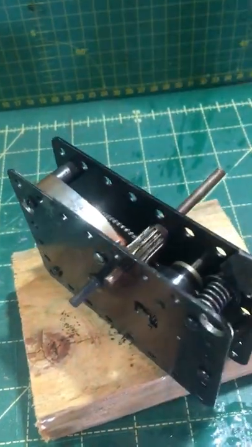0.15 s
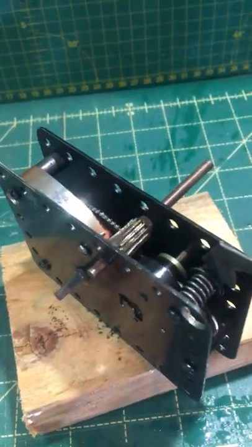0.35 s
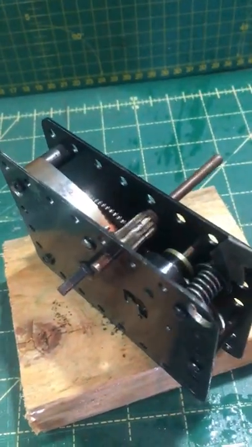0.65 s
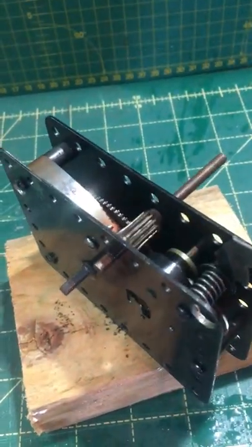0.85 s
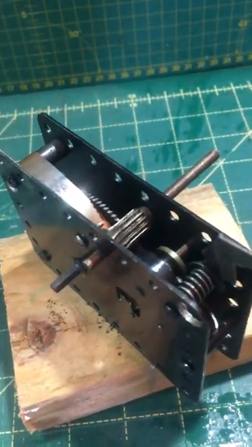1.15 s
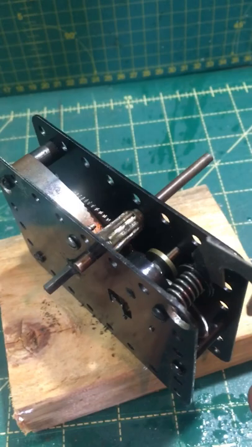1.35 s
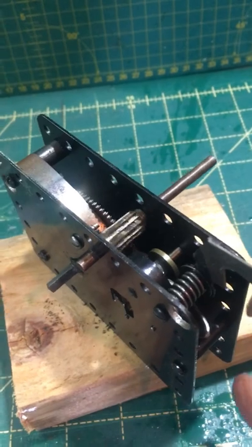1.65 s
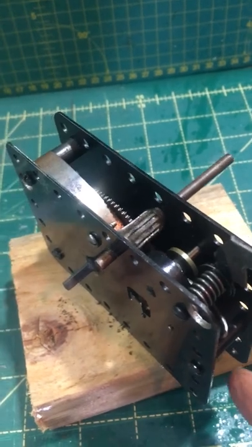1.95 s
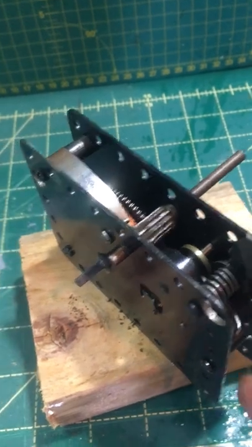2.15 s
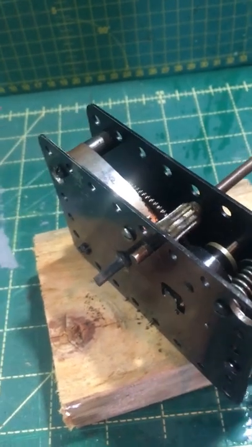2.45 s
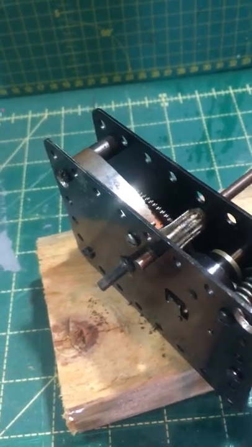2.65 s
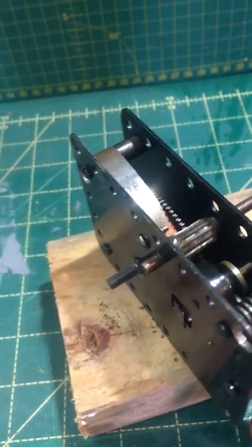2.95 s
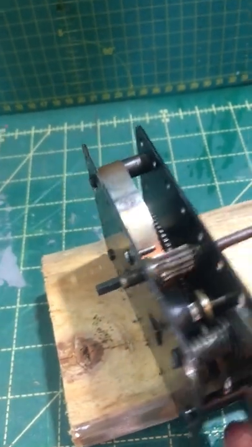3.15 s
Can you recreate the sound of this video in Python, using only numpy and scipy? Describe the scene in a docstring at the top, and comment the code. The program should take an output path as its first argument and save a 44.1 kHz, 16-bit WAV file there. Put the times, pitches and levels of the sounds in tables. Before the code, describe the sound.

A wind-up clockwork motor on a wooden block runs continuously, a bright, gritty metallic whirr over a low hum, with small scattered rattles, slowing slightly; close microphone in a quiet room.

```python
"""A bright, gritty whirr of small gears over a low hum: a wind-up clockwork motor on a wooden block, close by
in a quiet room, slowing a little as its spring unwinds. Gear teeth click and scrape in noise bursts that ring
the block, steel side plates and governor; the spinning governor shakes the block into harmonics of its speed.
The contact force swings with each turn of the governor and of the slower wheel that drives it. Loose parts
rattle now and then, a second low tone beats with the hum, and soft bumps and a faint rumble lie beneath."""
import sys
import numpy as np
from scipy import signal
from scipy.fft import rfft, irfft, next_fast_len
from scipy.io import wavfile
from scipy.ndimage import uniform_filter1d, map_coordinates

SR = 44100
rng = np.random.default_rng(int(sys.argv[2]) if len(sys.argv) > 2 else 0)


def to_wav(sig):
    """Store sig (one row per channel, or 1-D mono) as 16-bit WAV at the path in sys.argv[1].

    Samples outside -1..1 are clipped; the rate is SR.
    """
    pcm = np.clip(np.atleast_2d(sig), -1, 1) * 32767
    pcm = np.round(pcm).astype(np.int16)
    wavfile.write(sys.argv[1], SR, pcm.T)  # frames by channels


N = 145971

# steel side plate resonances, from the deepest set to the highest: f/Hz, width/Hz, relative level/dB
PLATE_DEEP_MODES = [(2062, 283, -5), (2276, 210, -3.5), (2360, 29, 3.5), (2470, 42, -3.5), (2810, 118, 0.5),
                    (2770, 760, -8)]
PLATE_LOW_MODES = [(3134, 150, 0.5), (3534, 410, -1.5), (3943, 76, -3.5), (3530, 730, -6)]
PLATE_MID_MODES = [(4392, 304, 0.5), (5080, 270, -5), (5190, 1100, -7)]
PLATE_HIGH_MODES = [(6110, 490, 0.5), (6705, 500, 0.5), (7304, 250, 0.5), (7600, 1250, -8.5)]
PLATE_TOP_MODES = [(8320, 380, -6.5), (8910, 280, 1), (9620, 310, 0), (10110, 210, -8), (11230, 790, -2),
                   (11660, 340, -5), (12900, 1300, -10), (13400, 6300, -11), (9500, 2600, -12.5)]

COARSE_TEETH, FINE_TEETH = 8, 15.6  # teeth passing in one governor turn
WHEEL_RATIO = 5.634  # governor turns for one turn of the driving wheel
WHEEL_START = 0.39  # turns of the wheel past its tight spot at the start


def gears(turns):
    """Two meshes excite the block, the plates and the governor, each hardest at its own point of the turn."""
    # gear noise in the low bands: t/s, block level/dB, knock level/dB, clatter level/dB, rattle level/dB
    low_levels = [(0, -55, -70, -49, -44.5), (0.27, -56.5, -64, -49, -44), (0.53, -55, -65, -49, -46),
                  (0.7, -55.5, -65, -50.5, -49), (0.9, -56, -68, -51, -47), (0.97, -55, -60.5, -47.5, -44),
                  (1.35, -56, -58.5, -45, -45.5), (1.64, -52.5, -59.5, -44, -42),
                  (1.75, -53, -53.5, -48, -50.5), (2.05, -53, -57, -46, -45),
                  (2.62, -55.5, -58, -45.5, -45), (2.8, -59.5, -55, -49.5, -47),
                  (3.12, -62.5, -60.5, -50.5, -49), (3.31, -62, -55.5, -49.5, -48.5)]
    # gear noise in the high bands: t/s, chatter level/dB, whirr level/dB, fizz level/dB, sizzle level/dB
    high_levels = [(0, -44.5, -40.5, -36, -42), (0.5, -45, -40.3, -36, -39),
                   (0.8, -43.5, -41.5, -35.5, -41), (1.1, -44.5, -38.5, -35, -38.8),
                   (1.33, -43, -40, -36, -39), (1.45, -44.5, -39, -35.5, -42), (1.7, -44, -39, -35.5, -43),
                   (1.95, -43, -40.5, -35, -42), (2.15, -45.5, -40.3, -35.5, -42.5),
                   (2.65, -45, -41, -36, -41), (2.85, -45.5, -42.5, -35.5, -37.5),
                   (3.1, -47.5, -43.5, -34.5, -41.5), (3.31, -48, -44.5, -37, -43)]
    # resonances of the wooden block: f/Hz, width/Hz, relative level/dB
    block_modes = [(257, 87, -3), (513, 153, -2.5), (732, 106, 1), (920, 167, 1), (680, 1070, -6)]
    # resonances of the frame: f/Hz, width/Hz, relative level/dB
    frame_modes = [(1319, 160, 1.5), (1400, 1000, -11.5)]
    # resonances of the governor: f/Hz, width/Hz, relative level/dB
    governor_modes = [(13620, 150, 11), (13370, 680, -7)]
    fine_db = -2.5  # the finer gear against the coarse one

    block_db, knock_db, clatter_db, rattle_db = curves(low_levels)
    chatter_db, whirr_db, fizz_db, sizzle_db = curves(high_levels)

    coarse = teeth(turns, count=COARSE_TEETH)
    fine = amp(fine_db) * teeth(turns, count=FINE_TEETH)
    mesh = unit(np.hypot(coarse, fine))

    block = contact(mesh, turns, scrape=0.36, grit_db=1.0, once_db=3.5, lag=0.024)
    knock = contact(mesh, turns, scrape=0.44, grit_db=1.5, once_db=3, lag=0.13)
    clatter = contact(mesh, turns, scrape=0.4, grit_db=0.9, once_db=1.4, lag=0.45, twice_db=1.0, wheel_db=1.35)
    rattle = contact(mesh, turns, scrape=0.38, grit_db=1.0, once_db=1.6, lag=0.57, twice_db=1.0, wheel_db=1.17)
    chatter = contact(mesh, turns, scrape=0.47, grit_db=0.6, once_db=2.5, lag=0.67, twice_db=0.5, wheel_db=1)
    whirr = contact(mesh, turns, scrape=0.54, grit_db=1.1, once_db=0.93, lag=0.45, twice_db=1.5, wheel_db=1.7)
    fizz = contact(mesh, turns, scrape=0.22, grit_db=1.0, once_db=1.03, lag=0.41, twice_db=2.0, wheel_db=0.84)
    sizzle = contact(mesh, turns, scrape=0.4, grit_db=-0.8, once_db=1.8, lag=0.65, twice_db=2, wheel_db=1.6)

    out = amp(block_db) * ring(block, block_modes)
    out += amp(knock_db) * ring(knock, frame_modes)
    out += amp(clatter_db) * ring(clatter, PLATE_DEEP_MODES)
    out += amp(rattle_db) * ring(rattle, PLATE_LOW_MODES)
    out += amp(chatter_db) * ring(chatter, PLATE_MID_MODES)
    out += amp(whirr_db) * ring(whirr, PLATE_HIGH_MODES)
    out += amp(fizz_db) * ring(fizz, PLATE_TOP_MODES)
    out += amp(sizzle_db) * ring(sizzle, governor_modes)
    return out


def teeth(turns, count):
    """Contact force of one gear with count teeth a governor turn: one short uneven blow for each tooth."""
    scatter, play = 0.083, 0.17  # timing scatter and slow play of the gear, both in teeth
    spread_db = 1.33  # unevenness of the blows
    rise_s, decay_s = 0.00031, 0.00049  # bedding in; decay at the coarse gear, shorter for finer teeth

    draws = rng.standard_normal((int(turns[-1] * count), 2))
    passed = turns * count + play * wobble(60)
    at = np.searchsorted(passed, np.arange(len(draws)) + scatter * draws[:, 0])
    sizes = amp(spread_db * np.clip(draws[:, 1], -2, 2))
    blows = np.bincount(at, sizes, N + 1)[:N]
    blows = uniform_filter1d(blows, max(int(rise_s * SR), 1))
    pole = np.exp(-count / (COARSE_TEETH * decay_s * SR))
    return unit(signal.lfilter([1], [1, -pole], blows))


def contact(mesh, turns, scrape, grit_db, once_db, lag, twice_db=0, wheel_db=0):
    """Tooth blows over a gritty scrape, swelling once and twice a governor turn and at the wheel's tight spot."""
    peaking = 0.11  # how pointed the wheel's swell is
    angle = 2 * np.pi * (turns - lag)
    wheel = wheel_angle(turns)
    swing_db = once_db * np.cos(angle) + twice_db * np.cos(2 * angle)
    swing_db += wheel_db * (np.cos(wheel) + peaking * np.cos(2 * wheel))
    return np.hypot(mesh, scrape) * amp(swing_db + grit_db * wobble(300))


def ring(force, modes):
    """Gritty contact through steep-sided resonances, at rms 1; two interleaved sets wander apart in level."""
    wander_db, wander_rate = 0.49, 4.89  # depth, random knots per second
    out = np.zeros(N)
    for part in (modes[::2], modes[1::2]):
        def gain(f):
            power = sum(amp(db) ** 2 / (1 + 2 * ((f - hz) / width) ** 2) ** 2 for hz, width, db in part)
            return np.sqrt(power)

        grit = force * np.sign(rng.standard_normal(N))  # random sign at every sample
        out += coloured(grit, gain) * amp(wander_db * wobble(wander_rate))
    return unit(out)


def wheel_angle(turns):
    """Angle of the driving wheel from its tight spot, in radians, geared down from the governor."""
    return 2 * np.pi * (turns / WHEEL_RATIO + WHEEL_START)


def hum(turns):
    """The unbalanced governor shakes the block at multiples of its speed; the driving wheel makes the hum sway."""
    # first three orders of the hum: t/s, first level/dB, second level/dB, third level/dB
    order_levels = [(0, -30, -55, -56), (0.22, -29.5, -48, -55.5), (0.5, -30.7, -47, -65),
                    (1.02, -31.5, -45, -72), (1.07, -34.5, -49, -64), (1.6, -37, -48.5, -62.5),
                    (2.1, -36, -48, -69), (2.6, -37.5, -49, -66), (2.85, -38.5, -63, -59),
                    (3.0, -43, -57, -51.5), (3.15, -38.5, -61, -60.5), (3.31, -38, -53, -62)]
    # weaker partials: multiple of the governor speed, peak level/dB, peak t/s, fade either side/(dB/s)
    weak_partials = [(5, -55, 1.798, 18), (5, -59.5, 0.37, 14.5), (8, -64.5, 0.45, 3.5),
                     (9, -61.5, 0.99, 7), (13, -67.5, 0.93, 7), (16, -67, 0.26, 5)]
    sway_share, flutter_rad = 0.02, 0.036  # swing with the wheel in level and in phase
    waver_db = 2.5  # each weak partial wavers by itself

    t = np.arange(N) / SR
    wheel = wheel_angle(turns)
    angle = 2 * np.pi * turns + flutter_rad * np.sin(wheel) + 0.048 * wobble(24.53)
    sway = 1 + sway_share * np.cos(wheel) + 0.079 * wobble(20)

    orders = list(enumerate(curves(order_levels), start=1))
    for k, peak_db, peak_s, fade in weak_partials:
        orders.append((k, peak_db - fade * np.abs(t - peak_s) + waver_db * wobble(11)))
    tone = sum(amp(db) * np.sin(k * angle + rng.uniform(0, 2 * np.pi)) for k, db in orders)
    return np.sqrt(2) * sway * tone


def rattles(count=3):
    """Now and then a loose part bounces a few times in quick succession and rings the plates."""
    # loose parts against the plates: t/s, low ring level/dB, high ring level/dB
    hits = [(.438, -34, -42), (.457, -34, -42), (0.945, -29.5, -39), (1.231, -29.5, -32), (1.420, -38, -27),
            (1.660, -36, -31), (2.062, -30.5, -36), (2.247, -30, -32), (2.266, -33, -42), (2.354, -40, -28),
            (2.667, -31, -36), (3.119, -35, -40), (3.198, -34, -42)]
    gap_s, loss_db, decay_s = 0.0028, 3.5, 0.0011  # time between bounces, loss a bounce, decay of each

    t = np.arange(SR // 20) / SR
    burst = np.zeros(len(t))
    for k in range(count):
        since = t - k * gap_s
        burst += amp(-loss_db * k) * (t >= k * gap_s) * np.exp(-np.abs(since) / decay_s)

    times, *levels = np.transpose(hits)
    low_modes = PLATE_DEEP_MODES + PLATE_LOW_MODES + PLATE_MID_MODES
    high_modes = PLATE_HIGH_MODES + PLATE_TOP_MODES
    out = np.zeros(N)
    for db, modes in zip(levels, (low_modes, high_modes)):
        strikes = np.bincount((times * SR).astype(int), amp(db), N)
        force = signal.fftconvolve(strikes, burst)[:N]
        out += np.sqrt(np.mean(force ** 2)) * ring(force, modes)  # ring() has rms 1: give back the force's rms
    return out


def beat():
    """A second low tone and its octave, sinking towards the hum and beating with it."""
    # the gliding tone: t/s, f/Hz, fundamental level/dB, octave level/dB
    glide = [(0, 75.2, -46, -54), (.55, 72.7, -49, -69), (.7, 70, -46, -51.5), (1.05, 68.9, -52, -51),
             (1.4, 66.6, -50, -62), (1.9, 61, -50, -58), (2.7, 61.8, -78, -59), (3.31, 62.3, -53, -65)]
    hz, first_db, second_db = curves(glide)
    angle = 2 * np.pi * np.cumsum(hz) / SR + 0.14 * wobble(20)
    return np.sqrt(2) * (amp(first_db) * np.sin(angle) + amp(second_db) * np.sin(2 * angle))


def bumps():
    """Now and then a soft low bump: a sine under a bell-shaped envelope."""
    # the bumps: t/s, envelope peak level/dB, f/Hz, length/s
    thuds = [(.29, -44, 130, 0.026), (.615, -39.5, 146, .017), (.745, -49, 156, .014),
             (1.032, -29, 66.1, 0.014), (2.68, -48, 144, 0.012)]
    t = np.arange(N) / SR
    out = np.zeros(N)
    for s, db, hz, length in thuds:
        out += amp(db) * np.exp(-((t - s) / length) ** 2) * np.sin(2 * np.pi * hz * (t - s))
    return out


def room():
    """A faint low rumble under the motor: noise shaped to a falling spectrum."""
    # spectrum of the rumble: f/Hz, relative level/dB
    spectrum = [(20, -14), (35, -8), (70, 0.5), (150, -6.5), (230, -12), (600, -19), (2000, -43),
                (15000, -39)]
    # loudness of the rumble: t/s, level/dB
    rumble_levels = [(0, -52), (1.02, -53), (1.1, -59), (3.31, -52.5)]
    hz, db = np.transpose(spectrum)
    level_db, = curves(rumble_levels)

    def gain(f):
        return amp(np.interp(np.log(f + 1), np.log(hz), db))

    return amp(level_db) * unit(coloured(rng.standard_normal(N), gain))


def amp(db):
    """Decibels to gain."""
    return 10 ** (np.asarray(db) / 20)


def unit(x):
    """Scale to rms 1."""
    return x / np.sqrt(np.mean(x ** 2) + 1e-20)


def curves(rows):
    """One value per sample for each column after the time."""
    s, *cols = np.transpose(rows)
    return [np.interp(np.arange(N) / SR, s, c) for c in cols]


def wobble(rate):
    """A smooth random curve, rate knots a second."""
    knots = rng.standard_normal(int(N * rate / SR) + 4)
    return map_coordinates(knots, [np.arange(N) * rate / SR])


def coloured(x, gain):
    """Causal minimum-phase filter with the given gain over frequency, built by folding the cepstrum."""
    m = 8192
    target = np.maximum(gain(np.fft.rfftfreq(m, 1 / SR)), 1e-6)
    cepstrum = irfft(np.log(target))
    cepstrum[1:m // 2] *= 2
    cepstrum[m // 2 + 1:] = 0
    return signal.fftconvolve(x, irfft(np.exp(rfft(cepstrum))))[:N]


def scene():
    """One governor speed drives the gears and the hum; the other layers keep their own times."""
    # governor speed as the spring unwinds: t/s, turns per second/Hz
    speed = [(0, 58.4), (.25, 57.8), (.7, 57.3), (1.1, 56.3), (2, 54.7), (2.6, 53.7), (2.85, 53.8),
             (3, 51.6), (3.15, 54.4), (3.31, 53.4)]
    turns = np.cumsum(curves(speed)[0]) / SR
    motor = gears(turns) + rattles(count=3) + hum(turns)
    return (motor + beat() + bumps() + room())[None]


def record(dry):
    """A sharp cut in the spectrum: nothing passes from the band limit upwards."""
    top_hz = 15720
    m = next_fast_len(N + SR // 2)
    passed = np.fft.rfftfreq(m, 1 / SR) < top_hz
    return irfft(rfft(dry, m) * passed, m)[..., :N]


dry = scene()
out = record(dry)
to_wav(out)
```